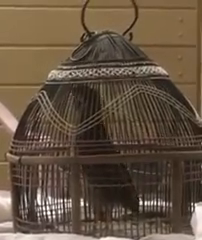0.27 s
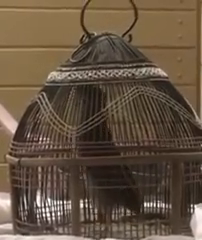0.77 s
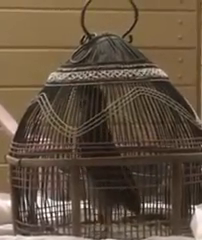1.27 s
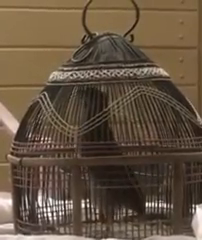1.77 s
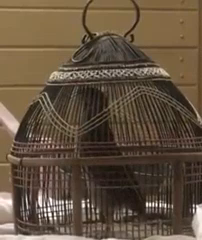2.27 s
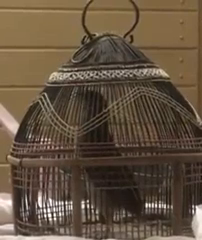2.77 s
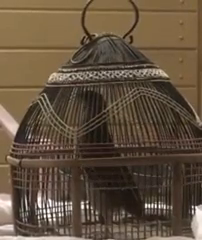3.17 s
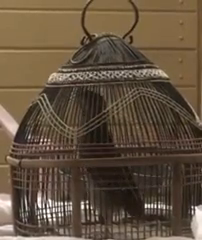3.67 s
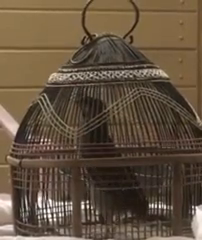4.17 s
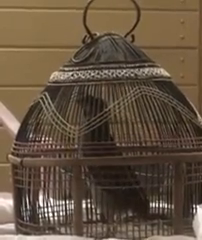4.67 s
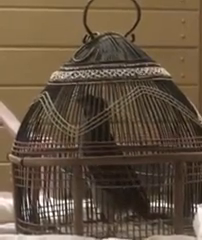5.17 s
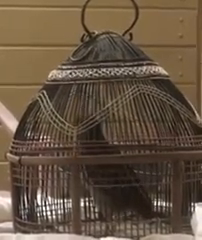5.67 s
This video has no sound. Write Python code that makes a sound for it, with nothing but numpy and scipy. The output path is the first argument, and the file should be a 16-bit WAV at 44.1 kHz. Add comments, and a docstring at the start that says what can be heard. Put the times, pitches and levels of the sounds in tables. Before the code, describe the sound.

A quail in a wicker cage, close to the microphone, gives four sharp three-note calls about a second apart. Each note is a breathy whistle that flicks upward, with a brief growl before the third, and the hard-walled room rings after it. Very soft, low hoots fall between the calls. Then the quail stops, leaving a low rumble, a faint rush from outside, thin distant squeals and a small bird's rising chirp.

```python
"""A quail in a wicker cage, close to the microphone in a hard-walled room, gives four three-note calls.
Each note is a whistle that swells and flicks up an octave, with air rasping at the beak; a low growl
leads into the third. A soft, low hoot is heard between the calls. Further off, over the room's rumble,
come faint peeps of other birds, a rush from outside, thin squeals and a small bird's rising chirp."""
import sys
import numpy as np
from scipy import signal
from scipy.fft import rfft, irfft, next_fast_len
from scipy.io import wavfile
from scipy.ndimage import uniform_filter1d, minimum_filter1d, map_coordinates

SR = 44100
rng = np.random.default_rng(int(sys.argv[2]) if len(sys.argv) > 2 else 0)


def write(x):
    x = np.atleast_2d(x).T
    wavfile.write(sys.argv[1], SR, np.round(np.clip(x, -1, 1) * 32767).astype(np.int16))


N = 261070
LEAD = SR  # the room is already ringing a second before time zero
TIME = np.arange(-LEAD, N) / SR

# Levels in the tables are relative, ahead of the mix.
# the room's rumble: frequency_hz, density_db
RUMBLE_SPECTRUM = [(20, -33), (35, -11), (55, -2.5), (125, 1.5), (180, -2), (250, -7.5), (350, -12.5),
                   (600, -20), (1200, -26), (2500, -26), (5000, -34), (8000, -39.5), (15000, -49.5)]
# soft, low hoots between the calls: start_s, end_s, first_hz, middle_hz, last_hz, level_db
HOOTS = [(-.12, 0.282, 478, 475, 437.4, -52), (0.817, 1.36, 400, 463, 460, -54.5),
         (2.017, 2.617, 410.4, 426, 449.5, -53.5), (3.118, 3.63, 431, 443, 437, -54.5)]
# whistled notes, three to a call: flick_s, level_db
NOTES = [(.3232, -9.5), (.5351, -6.5), (.6398, -5.5), (1.3418, -9), (1.5528, -5.5), (1.6579, -5),
         (2.3670, -9), (2.5775, -5.5), (2.6849, -5.5), (3.4347, -8.5), (3.6482, -6), (3.7523, -6)]
# the last note of the call before time zero: flick_s, level_db
EARLIER_NOTE = (-.36, -6)
# a call's three notes, each leading in longer and lower than the last:
# lead_ms, lead_hz, lead_db, swell_db_per_ms, bend_ms, flick_ms, top_hz, roughness (share of the pitch)
NOTE_SHAPES = [(27.83, 1370, -26, 2, 2.4, 2.05, 4700, 0.017), (37, 1270, -27.5, 1.9, 2.7, 2.1, 4700, .02),
               (66, 1115, -28, 3.5, 4, 2.4, 5200, .035)]
# the whistle's harmonics: multiple, level_db
WHISTLE_HARMONICS = [(1, -0.5), (2, -32), (3, -45), (4, -53)]
# air at the beak: frequency_hz, density_db
RASP_SPECTRUM = [(900, -20.5), (2000, 1.5), (4300, 1.5), (5400, -7.5), (6200, 0), (6900, -7.5), (8200, 1),
                 (10000, -6), (11200, -21), (12800, -11), (15500, -19)]
# the growl, and the catch in the throat as it starts: from_flick_ms, pitch_hz, level_db
GROWL = [(-75, 560, -59), (-67.5, 610, -42), (-43, 570, -46.5), (-30.5, 720, -41.5), (-19.5, 790, -38.5),
         (-6, 820, -60.5)]
CATCH = [(-74, 600, -55), (-65.5, 680, -33), (-53, 640, -50.5)]
# their harmonics: multiple, level_db
GROWL_HARMONICS = [(1, -2), (2, 7), (3, 0), (4, -0.5), (5, 0.5), (6, -6.5)]
CATCH_HARMONICS = [(1, -22.5), (2, -12.5), (3, -2.5), (4, 0), (5, 0.5), (6, -1.5), (7, -7)]
# reflections from cage, table and wall: delay_ms, signed_gain
REFLECTIONS = [(0.476, -0.17), (1.379, -0.11), (1.713, 0.063), (2.325, 0.034), (2.978, -0.39),
               (4.466, 0.15), (5.967, -0.22), (7.01, 0.135), (9.364, -0.2), (10.537, 0.072),
               (11.003, -0.25), (11.816, -0.098), (12.974, 0.013), (18.261, 0.025)]
# the room's ring: frequency_hz, t60_s
ROOM_DECAY = [(300, 0.81), (1200, 0.71), (2000, 0.68), (3000, 0.77), (4500, 0.62), (8000, 0.53),
              (14000, .24)]
# far birds' peeps: start_s, end_s, pitch_hz, level_db
PEEPS = [(2.86, 3.076, 5240, -69.5), (3.08, 3.308, 3870, -69.5), (3.19, 3.301, 2830, -69),
         (3.33, 3.393, 5250, -72)]
# the rush from outside: frequency_hz, density_db
RUSH_SPECTRUM = [(200, -28), (600, 1.5), (1500, 3), (3000, -3.5), (4000, -2), (5500, -13.5), (8000, -17),
                 (11000, -25.5), (15000, -25.5)]
# its rise and fall: time_s, level_db
RUSH_LEVEL = [(3.9, -90), (4.4, -72.5), (4.9, -71.5), (5.3, -62), (5.92, -69.5)]
# distant squeals: start_s, end_s, pitch_hz, level_db, attack_s, release_s, harmonic_step_db
SQUEALS = [(4.42, 4.952, 6200, -68.5, .15, .07, -30), (4.43, 4.758, 1505, -69.5, 0.055, 0.19, -21),
           (4.801, 5.449, 1203, -61.5, 0.077, 0.18, -8), (5.06, 5.624, 1495, -53.5, 0.12, 0.11, -9),
           (5.52, 5.917, 1497, -56, 0.043, 0.11, -15.5), (5.518, 5.92, 6160, -74.5, 0.055, 0.21, -30)]
# the chirp's two voices: time_s, low_hz, low_db, high_hz, high_db
CHIRP = [(4.876, 2602, -73, 5210, -64), (4.889, 2776, -49, 5440, -40), (4.925, 3364, -40.5, 5950, -50),
         (4.95, 3755, -37.5, 6200, -46), (4.966, 4450, -34, 6335, -65), (4.997, 4696, -36, 6290, -69),
         (5.019, 4400, -56.5, 6200, -80)]
# the lower voice's harmonics: multiple, level_db
CHIRP_HARMONICS = [(1, -0.5), (2, -21.5), (3, -22), (4, -28.5)]


def amp(db):
    """Decibels to gain."""
    return 10 ** (np.asarray(db) / 20)


def along(points, hz):
    """Read (Hz, value) points on a log frequency axis."""
    knots_hz, values = np.transpose(points)
    return np.interp(np.log(hz + 1), np.log(knots_hz + 1), values)


def wobble(rate, size):
    """A smooth random curve, rate knots a second."""
    knots = rng.standard_normal(int(size * rate / SR) + 4)
    return map_coordinates(knots, [np.arange(size) * rate / SR])


def filtered(x, response):
    """Filter x by a gain given as a function of Hz."""
    size = next_fast_len(len(x) + 8192)
    return irfft(rfft(x, size) * response(np.fft.rfftfreq(size, 1 / SR)), size)[:len(x)]


def noise(spectrum):
    """Coloured noise of rms 1."""
    x = filtered(rng.standard_normal(len(TIME)), lambda hz: amp(along(spectrum, hz)))
    return x / np.sqrt(np.mean(x ** 2) + 1e-20)


def add_tone(track, s, hz, db, harmonics=((1, 0),), jitter=0, rate=100):
    """Add a tone that follows a pitch and a level; its pitch trembles by the share jitter."""
    span = (TIME >= s[0]) & (TIME <= s[-1])
    t = TIME[span]
    tremble = np.interp(t, s, jitter * np.ones(len(s))) * wobble(rate, len(t))
    pitch = np.interp(t, s, hz) * (1 + tremble)
    phase = 2 * np.pi * np.cumsum(pitch) / SR
    wave = sum(amp(level) * np.sin(k * phase) * (k * pitch < SR / 2) for k, level in harmonics)
    track[span] += np.sqrt(2) * amp(np.interp(t, s, db)) * wave


def swell(start, end, attack_s, release_s, edge_db=-13.5):
    """Attack, hold and release of a soft tone: times in s, levels in dB."""
    s = np.linspace(start, end, num=64)
    fade = np.maximum(1 - (s - start) / attack_s, 1 - (end - s) / release_s)
    return s, edge_db * np.maximum(0, fade)


def rumble():
    """Room tone: a low, steady rumble around the microphone."""
    return amp(-56.5) * noise(RUMBLE_SPECTRUM)


def hoots():
    """Soft, low, slightly hoarse hoots between the calls; each glides slowly and wavers in strength."""
    out = np.zeros(len(TIME))
    for start, end, *glide_hz, db in HOOTS:
        s, level = swell(start, end, attack_s=.11, release_s=.19)
        hz = np.interp(s, [start, (start + end) / 2, end], glide_hz)
        add_tone(out, s, hz, db + level, jitter=.025, rate=54)
    return out * amp(1.3 * wobble(18, len(TIME)))


def whistle(flick_s, db, shape):
    """A note holds a quiet low pitch, bends up as it swells, flicks roughly to its top and gives out."""
    lead_ms, lead_hz, lead_db, swell_db_per_ms, bend_ms, flick_ms, top_hz, roughness = shape
    body_hz, flick_hz, knee = 1879, 252, 5.9
    bend_at_ms, full_at_ms, release_db_per_ms = -12.62, -6.57, 9.5
    ms = np.linspace(-lead_ms, 5 * flick_ms, num=400)  # zero at the flick
    bend = 1 / (1 + np.exp(-(ms - bend_at_ms) / bend_ms))
    low_hz = lead_hz * (1 + .018 * rng.standard_normal())
    hz = low_hz + (body_hz - low_hz) * bend + flick_hz * np.exp(ms / flick_ms)
    hz /= (1 + (hz / top_hz) ** knee) ** (1 / knee)  # levels off at the top pitch
    onset_db = -20 * np.maximum(0, 1 - (ms + lead_ms) / 8)  # fades in over 8 ms
    body_db = np.interp(ms, [-flick_ms, 0], [-1.4, 1.2])
    swell_db = swell_db_per_ms * np.minimum(0, ms - full_at_ms)
    release_db = release_db_per_ms * np.maximum(0, ms - 2.01 * flick_ms)
    level = onset_db + np.maximum(lead_db, body_db + swell_db) - release_db
    # clean body, unsteady lead-in, rough flick
    tremble = .006 + .021 * (1 - bend) + roughness * np.clip(ms / flick_ms, 0, 1)
    out = np.zeros(len(TIME))
    add_tone(out, flick_s + ms / 1000, hz, db + level - 4, WHISTLE_HARMONICS, jitter=tremble, rate=1800)
    return out


def beak_air(note, flick_s, db):
    """Strength of the rasp: it grows as the bird pushes harder, with a puff at the top of the flick."""
    push = np.abs(uniform_filter1d(note ** 2, size=64)) ** .3
    from_puff_ms = (TIME - flick_s) * 1000 - 2.5
    puff = np.maximum(0, 1 - np.abs(from_puff_ms) / 4) ** 2
    return amp(1.4 * db) * (push + amp(5.5 + db) * puff)


def growl(flick_s):
    """The throat catches and a low, rough growl leads up to the flick."""
    out = np.zeros(len(TIME))
    ms, hz, db = np.transpose(GROWL)
    add_tone(out, flick_s + ms / 1000, hz, db - 2, GROWL_HARMONICS, jitter=.1, rate=450)
    ms, hz, db = np.transpose(CATCH)
    add_tone(out, flick_s + ms / 1000, hz, db, CATCH_HARMONICS, jitter=.09, rate=600)
    return out


def quail_calls():
    """The caged quail: three breathy whistles to a call, growling into the third."""
    voice, airflow = np.zeros((2, len(TIME)))
    for index, (flick_s, db) in enumerate([EARLIER_NOTE, *NOTES], start=-1):
        place = index % 3
        note = whistle(flick_s, db, NOTE_SHAPES[place])
        if place == 2:
            note += growl(flick_s)
        voice += note
        airflow += beak_air(note, flick_s, db)
    return voice + amp(-31.5) * airflow * noise(RASP_SPECTRUM)


def near_walls(x):
    """Close reflections reach the microphone behind the direct sound and make the flick stutter."""
    ms, gain = np.transpose(REFLECTIONS)
    pad = 16  # samples of room for the sinc pulses
    delays = np.append(0, ms)[:, None] * SR / 1000
    pulses = np.sinc(np.arange(SR // 40) - pad - delays)
    return signal.fftconvolve(x, np.append(1, gain) @ pulses)[pad:][:len(x)]


def room(x, gap_s, build_s, early_db=3, early_s=.02):
    """The hard walls' diffuse tail builds up after a gap, strongest at first; the treble dies soonest."""
    hz, t, spectra = signal.stft(rng.standard_normal(SR), SR, nperseg=256)
    decay = amp(-60 * t / along(ROOM_DECAY, hz)[:, None])
    tail = signal.istft(spectra * decay, SR, nperseg=256)[1]
    age = np.maximum(np.arange(len(tail)) / SR - gap_s, 0)
    tail *= (1 - np.exp(-age / build_s)) * amp(early_db * np.exp(-age / early_s))
    return signal.fftconvolve(x, tail / np.linalg.norm(tail))[:len(x)]


def peeps():
    """Other birds, far off: each thin peep swells and fades on one pitch."""
    out = np.zeros(len(TIME))
    for start, end, hz, db in PEEPS:
        s = np.linspace(start, end, num=4)
        add_tone(out, s, np.full(4, hz), db + np.array([-14, 0, 0, -14]), jitter=.002)
    return out


def outside_rush():
    """A faint rush from outside rises after the last call."""
    return amp(np.interp(TIME, *np.transpose(RUSH_LEVEL))) * noise(RUSH_SPECTRUM)


def squeals(waver_hz=13):
    """Thin squeals, far from the microphone, waver in pitch and strength."""
    out = np.zeros(len(TIME))
    for start, end, hz, db, attack_s, release_s, step_db in SQUEALS:
        s, level = swell(start, end, attack_s, release_s)
        harmonics = [(k + 1, k * step_db) for k in range(4)]
        add_tone(out, s, np.full(len(s), hz), db + level, harmonics, jitter=waver_hz / hz, rate=110)
    return out * amp(1.1 * wobble(14, len(TIME)))


def chirp():
    """A small bird's harsh rising chirp at a distance, both sides of the syrinx sounding."""
    out = np.zeros(len(TIME))
    s, low_hz, low_db, high_hz, high_db = np.transpose(CHIRP)
    add_tone(out, s, low_hz, low_db - 1.5, CHIRP_HARMONICS, jitter=.085, rate=1100)
    add_tone(out, s, high_hz, high_db, [(1, -3.5), (2, -23)], jitter=.066, rate=1400)
    return out


def scene():
    """One microphone near the cage; the chirp and the squeals reach it mostly through the room."""
    quail = quail_calls()
    close = near_walls(quail) + amp(-6) * room(quail, gap_s=.0088, build_s=.0011, early_db=8)
    far = amp(-2) * chirp() + amp(-.15) * squeals()
    far_tail = room(far, gap_s=.0034, build_s=.0031, early_db=7, early_s=.031)
    distant = amp(-2.5) * far + amp(-.5) * far_tail
    ambience = rumble() + outside_rush()
    hoot = hoots()
    soft = amp(-3) * hoot + amp(-7) * room(hoot, gap_s=.0049, build_s=.0062) + peeps()
    return (close + soft + distant + ambience)[None, LEAD:]


def record(dry, ceiling=.92, top_hz=15750):
    """A limiter after the microphone ducks the tallest peaks; nothing is kept above the band limit."""
    needed = np.minimum(1, ceiling / (np.abs(dry[0]) + 1e-9))
    gain = uniform_filter1d(minimum_filter1d(needed, size=200), size=100)
    return filtered(dry[0] * gain, lambda hz: hz < top_hz)[None]


dry = scene()
out = record(dry)
write(out)
```